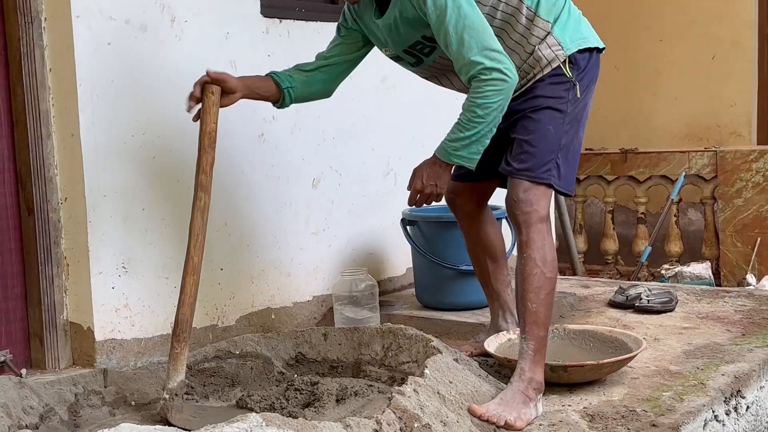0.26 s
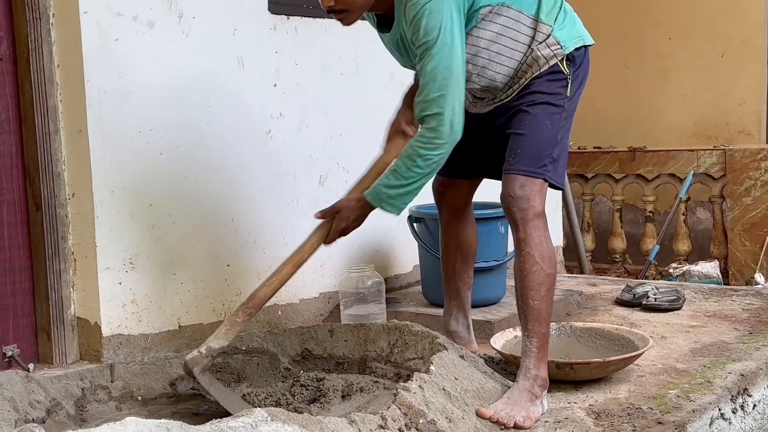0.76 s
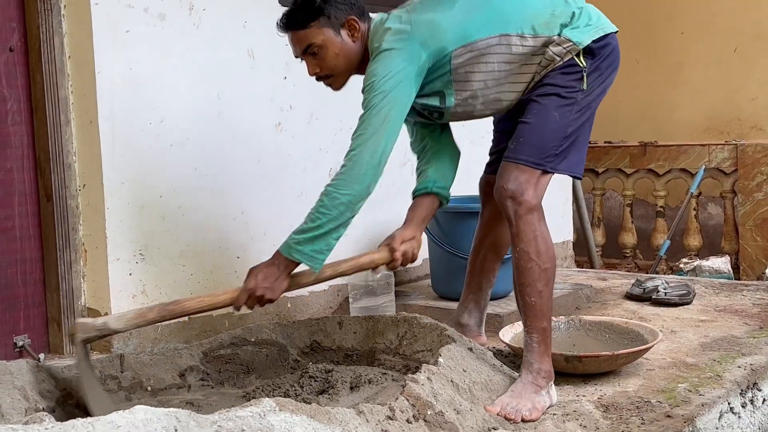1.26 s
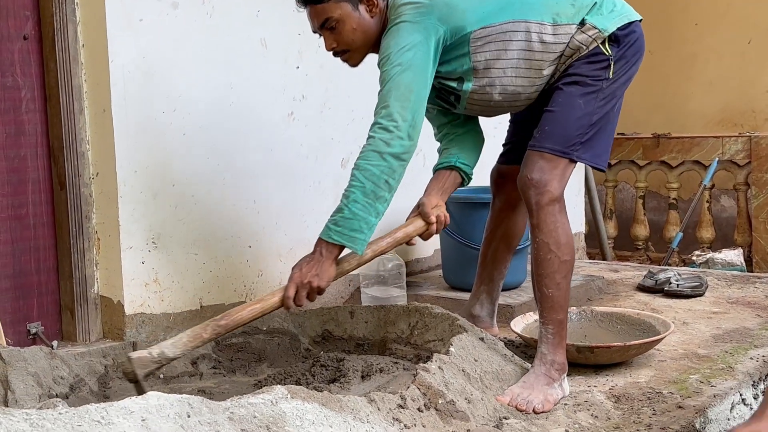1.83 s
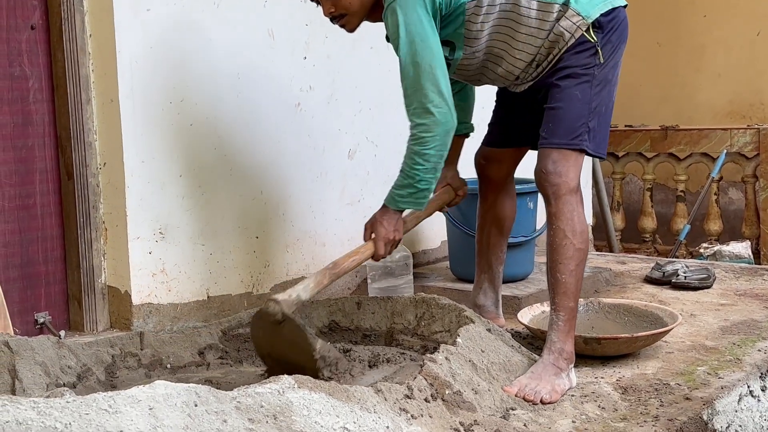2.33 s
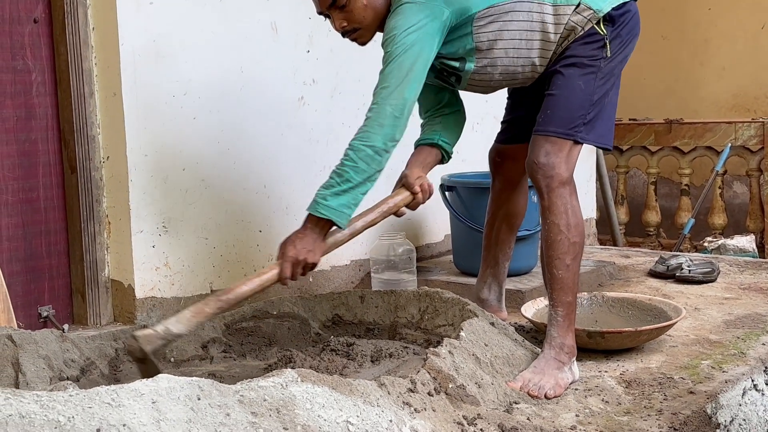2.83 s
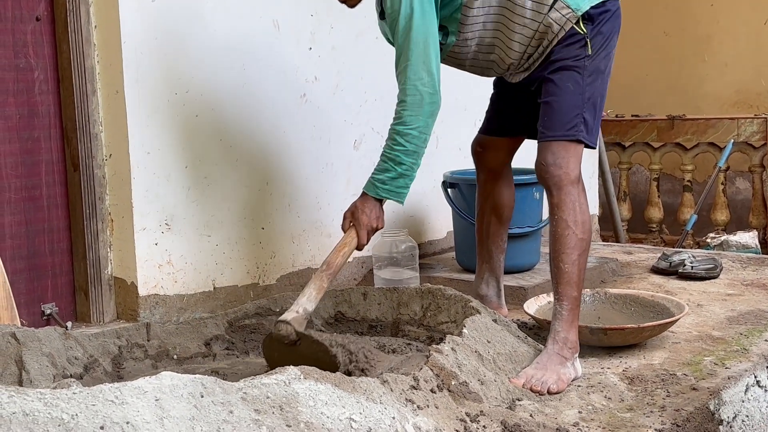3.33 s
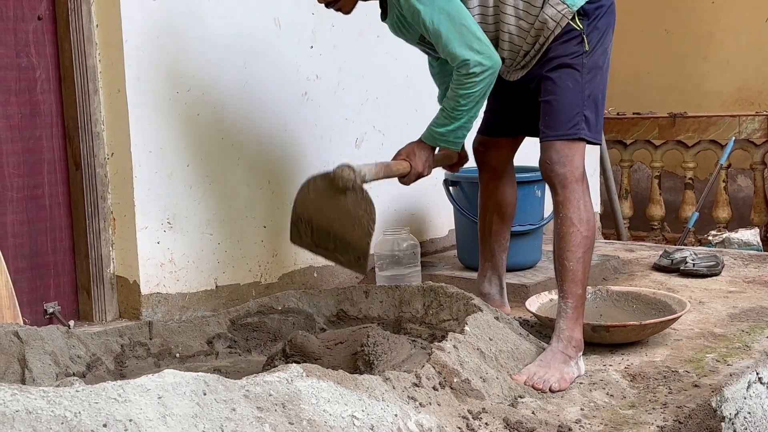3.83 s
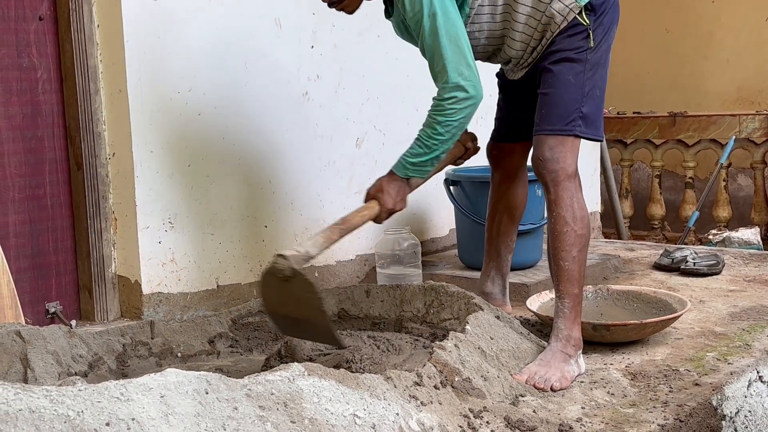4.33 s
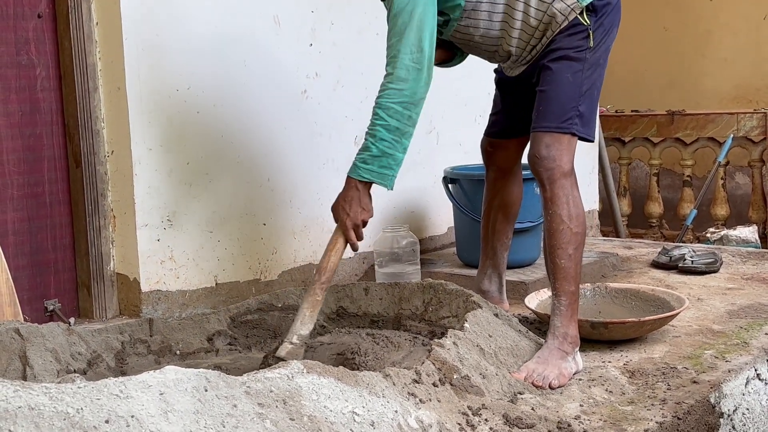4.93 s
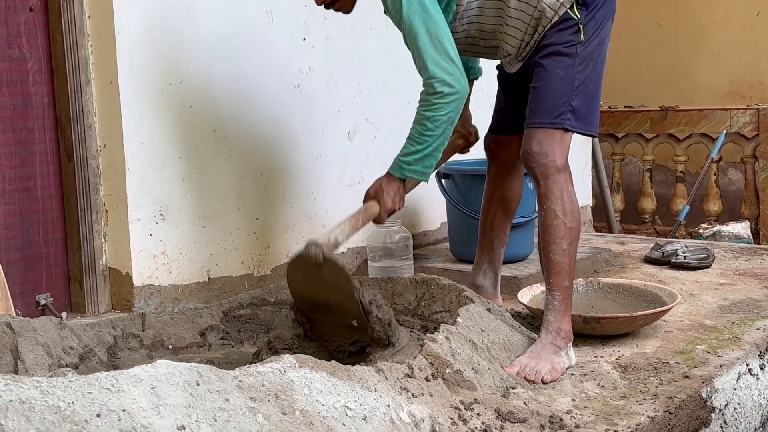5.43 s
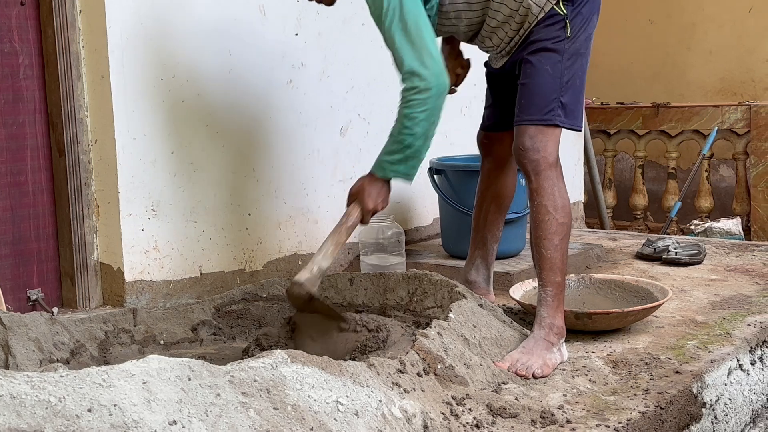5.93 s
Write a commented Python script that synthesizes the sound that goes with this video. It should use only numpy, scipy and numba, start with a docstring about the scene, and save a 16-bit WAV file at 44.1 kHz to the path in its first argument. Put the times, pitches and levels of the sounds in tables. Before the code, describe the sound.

Wet cement mix is scraped, chopped and turned with a hoe beside a wall, with sandy showers, small plops and a low receding engine.

```python
"""Wet mortar is mixed with a steel hoe on a concrete floor beside a house wall.
From the start a distant engine (harmonics and noise in resonances) drops its revs, pulls and recedes;
the air and hum are steady, and the blade drags through the mix (random grains, filtered).
Soon it chops in (stick-slip pulses); mortar lands, slumps or is scraped along in grainy showers; then
clods plop, grains snap, air gulps; late on a far motor drones. Walls echo the work; two microphones hear it."""
import sys
import numpy as np
from scipy import signal
from scipy.fft import rfft, irfft
from scipy.io import wavfile
from scipy.ndimage import uniform_filter1d
from numba import njit

SR = 44100
rng = np.random.default_rng(int(sys.argv[2]) if len(sys.argv) > 2 else 0)


def unload_wav(signal):
    """Save mono or channel-first audio to the path in sys.argv[1] as 16-bit WAV at rate SR, clipped to [-1, 1]."""
    wavfile.write(
        sys.argv[1],
        SR,
        np.round(np.clip(np.atleast_2d(signal).T, -1, 1) * 32767).astype(np.int16),
    )


N = 272538
TIME = np.arange(N) / SR


def undb(db):
    """Amplitude ratio: 20 dB is a factor of ten."""
    return 10 ** (np.asarray(db) / 20)


def unit(x):
    """Power normalization: scale to rms 1."""
    return x / np.sqrt(np.mean(x ** 2) + 1e-18)


def burst(x):
    """Energy normalization: give a short sound the energy of 10 ms at rms 1."""
    return x / np.sqrt(np.sum(x ** 2) / (SR / 100) + 1e-18)


def add(out, s, x):
    """Superposition: sum x into out from time s [s]."""
    i = max(int(s * SR), 0)
    out[i:i + len(x)] += x[:N - i]


def curves(table):
    """Linear interpolation in time of every column after the first."""
    s, *columns = np.transpose(table)
    return [np.interp(TIME, s, c) for c in columns]


def colour(x, points, size=2048):
    """Minimum-phase filtering, by a folded cepstrum, through points (frequency [Hz], gain [dB])."""
    hz, db = np.transpose(points)
    f = np.maximum(np.fft.rfftfreq(size, 1 / SR), 1)
    log_gain = np.log(undb(np.interp(np.log(f), np.log(hz), db)))
    cepstrum = irfft(log_gain)
    cepstrum[1:size // 2] *= 2
    cepstrum[size // 2 + 1:] = 0
    response = irfft(np.exp(rfft(cepstrum)))
    return signal.fftconvolve(x, response)[:len(x)]


@njit
def svf(x, hz, width):
    """Second-order resonance: a state-variable band-pass whose centre may move."""
    y, b, l = np.empty(len(x)), 0., 0.
    for i in range(len(x)):
        g, k = np.tan(np.pi * hz[i] / SR), width / hz[i]
        v = (b + g * (x[i] - l)) / (1 + g * (g + k))
        b, l, y[i] = 2 * v - b, l + 2 * g * v, k * v
    return y


def band(x, hz, width_hz):
    """Cascaded resonance: two equal band-passes in series, fixed or moving."""
    centre = hz + np.zeros(len(x))
    once = svf(x + 1e-18, centre, float(width_hz))
    return svf(once, centre, float(width_hz))


def grains(n, rate, spread_db):
    """Shot noise: random clicks, rate per second on average, many small and a few large."""
    size = undb(spread_db * np.minimum(rng.exponential(size=n), 4))
    struck = rng.random(n) < rate / SR
    return unit(struck * rng.choice([-1, 1], n) * size)


def walk(rate):
    """Low-frequency noise: smoothed random steps, rate per second, at rms near 1."""
    k = max(int(SR / rate), 1)
    steps = np.repeat(rng.standard_normal(N // k + 2), k)
    return unit(uniform_filter1d(steps, k)[:N])


# Distant engine: (time [s], firing rate [1/s], boom level [dB], boom centre [Hz], low thrum level [dB])
ENGINE_COURSE = [(0, 35.5, -39.5, 169, -62), (.17, 23.3, -39, 141, -43.5), (.45, 19.8, -42, 162, -34.5),
                 (.62, 19.9, -44.5, 167, -49.5), (1.1, 18.3, -40, 159.3, -49), (2.1, 19.4, -42.5, 155, -51),
                 (2.7, 19.85, -45.5, 146, -60), (3.5, 19.9, -52.5, 154, -63), (5.1, 22.1, -53, 161, -49),
                 (6.18, 22, -52, 165, -59)]


def engine(boom_width_hz=54, thrum_hz=70, thrum_width_hz=48, flutter_db=3.0,
           rough_db=-12, rough_db_per_hz=1.45, count=12):
    """Harmonic excitation of resonances: low exhaust harmonics, scrambled by many paths between houses."""
    firing_hz, boom_db, boom_hz, thrum_db = curves(ENGINE_COURSE)
    turns = np.cumsum(firing_hz * (1 + 0.0028 * walk(6))) / SR
    k = np.arange(2, count)[:, None]
    # each harmonic has its own starting phase and flutter
    tones = np.sqrt(2) * np.sin(2 * np.pi * (k * turns + rng.random(k.shape)))
    harmonics = tones * np.array([undb(flutter_db * walk(4)) for _ in k])
    # the boom is rougher at high revs
    noise_db = boom_db + rough_db + rough_db_per_hz * (firing_hz - firing_hz.min())
    out = undb(noise_db) * unit(band(rng.standard_normal(N), boom_hz, boom_width_hz))
    for db, hz, width in (boom_db, boom_hz, boom_width_hz), (thrum_db, thrum_hz, thrum_width_hz):
        detuning = ((k * firing_hz - hz) / (width / 2)) ** 2
        gain = 1 / (1 + detuning ** 2)
        out = out + undb(db) * np.sum(gain * harmonics, axis=0) / np.sqrt(np.sum(gain ** 2, axis=0))
    return out


# Spectrum of the outdoor air: (frequency [Hz], gain [dB])
AIR_SPECTRUM = [(22, -42), (36, -2), (50, -5.5), (65, 3.5), (110, -1.5), (170, -6.5), (240, -9.5),
                (480, -15), (1000, -19), (2500, -28), (7000, -37.5), (15500, -58)]
# Steady machine hum: (frequency [Hz], level [dB])
HUM_TONES = [(38.3, -54.5), (60, -62.5)]
AIR_DB = -50


def yard(side_db=-19):
    """Partial coherence: shared noise and hum with a little opposed noise in the two microphones."""
    mid, side = (unit(colour(rng.standard_normal(N), AIR_SPECTRUM, size=8192)) for _ in range(2))
    side = colour(side, [(35, -7), (130, 4.5), (800, 18.5), (2500, -4)])
    hum = sum(undb(db) * unit(np.sin(2 * np.pi * hz * TIME + 0.5 * walk(2.8))) for hz, db in HUM_TONES)
    pair = mid + undb(side_db) * side * np.array([[1], [-1]])
    return hum + undb(AIR_DB + 1.05 * walk(4.96)) * pair


# every stroke eases off as the arm slows, then the blade lifts
STROKE_SAG_DB_PER_S, STROKE_LIFT_DB_PER_S = 6, 187


def stroke(s, swell, length):
    """Force envelope: smooth build-up of arm speed, slow easing, then a steep decay as the blade lifts."""
    t = np.maximum(TIME - s, 0)
    sag_db = STROKE_SAG_DB_PER_S * np.maximum(t - swell, 0)
    lift_db = STROKE_LIFT_DB_PER_S * np.maximum(t - length, 0)
    rise = np.sin(np.pi / 2 * np.minimum(t / swell, 1)) ** 2
    return rise * undb(-np.minimum(sag_db + lift_db, 200))


# Damped modes of blade and handle in the mud: (frequency [Hz], width [Hz], gain [dB])
BLADE_MODES = [(747, 170, 6), (1013, 260, 6.5), (1245, 600, 12), (1675, 125, 9), (1994, 520, 5),
               (2360, 1200, 0.5), (3180, 1800, -6.5)]


def blade(x):
    """Modal superposition: the hoe's short, muddy ring as a sum of damped resonances."""
    return sum(undb(db) * band(x, hz, width) for hz, width, db in BLADE_MODES)


# Strokes of the blade pulled through the mix:
# (time [s], swell [s], start to lift [s], relative level [dB], wetness [dB])
PULL_STROKES = [(0, 0.0022, 0.12, -50, 6.5), (0.134, 0.024, 0.45, -57, 9.5),
                (0.601, 0.008, 0.21, -44, -0.5), (0.84, 0.0067, 0.13, -41.5, -1),
                (1.004, 0.029, 0.76, -52, 3.5), (1.415, 0.12, 0.2, -48.5, 6),
                (1.643, 0.0047, 0.1, -41, 3.5), (1.751, 0.018, 0.25, -44.5, 7),
                (2.014, 0.042, 0.08, -40.5, 6.5), (2.12, 0.028, 0.21, -49.5, 2),
                (2.853, 0.025, 0.53, -46, 0.5), (3.45, 0.052, 0.15, -54.5, 2.5),
                (4.036, 0.018, 0.23, -47.5, 0.5), (4.31, 0.023, 0.3, -50.5, 1),
                (4.616, 0.023, 0.02, -40.5, -1), (4.641, 0.12, 0.32, -43, -0.5),
                (4.762, 0.019, 0.033, -39.5, -7), (4.94, 0.058, 0.099, -43.5, 2),
                (5.061, 0.023, 0.39, -51.5, 3), (5.664, 0.028, 0.17, -56, 6.5),
                (5.916, 0.039, 0.53, -52.5, 1)]
# The flat of the blade skims wet sand and only hisses:
# (time [s], swell [s], start to lift [s], relative level [dB])
SKIM_STROKES = [(0.409, 0.064, 0.1, -43), (2.359, 0.045, 0.18, -53), (2.765, .13, 0.14, -44),
                (3.1, 0.072, 0.12, -44.5), (3.492, 0.15, 0.12, -44), (3.956, 0.012, 0.094, -42),
                (5.135, 0.06, 0.077, -46.5), (5.321, 0.1, 0.17, -47.5)]
# Spectrum of rolling sand: (frequency [Hz], gain [dB])
SAND_SPECTRUM = [(300, -2.5), (1200, -3.5), (2600, 2), (3800, 0), (5000, -0.5), (7000, 2), (8500, 2),
                 (10200, 0.5), (11800, -6.5), (15500, -7)]
# Spectrum of coarse grit on the edge: (frequency [Hz], gain [dB])
RASP_SPECTRUM = [(200, -14), (500, -8), (800, 6), (1300, 4), (2000, 0.5), (3000, -9), (6000, -32),
                 (15000, -39)]
# Spectrum of wet lumps: (frequency [Hz], gain [dB])
MUD_SPECTRUM = [(40, -30.5), (120, -3), (260, 6.5), (480, 4), (750, -4), (1400, -11), (5000, -69)]
# hiss and rasp lost [dB] per dB of wetness: a wetter mix churns more
WET_MUFFLE, WET_SMOOTH = 0.3, 0.1
# loose sand keeps trickling between strokes; level before the layer gains
TRICKLE_DB = -63.5


def drag(catch_db=1.88, sand_gain_db=1.15, rasp_gain_db=-3.5, mud_gain_db=-3.0, crackle_db=-12,
         crackle_rate=160, crackle_s=0.0007, ring_gain_db=-9, fold_db=1.5):
    """Granular friction: sand rolls under steel, grit catches and rings the blade, wet lumps fold over."""
    # strokes that overlap add in power
    sand_power = rasp_power = mud_power = undb(TRICKLE_DB) ** 2
    for s, swell, length, db, wet_db in PULL_STROKES:
        force = undb(db) * stroke(s, swell, length)
        sand_power = sand_power + (force * undb(-WET_MUFFLE * wet_db)) ** 2
        rasp_power = rasp_power + (force * undb(-WET_SMOOTH * wet_db)) ** 2
        mud_power = mud_power + (force * undb(wet_db)) ** 2
    for s, swell, length, db in SKIM_STROKES:
        sand_power = sand_power + (undb(db) * stroke(s, swell, length)) ** 2

    catching = undb(catch_db * np.clip(walk(55), -2, 2))
    sand = undb(sand_gain_db) * unit(colour(grains(N, 16000, 2.3), SAND_SPECTRUM))
    rasp = undb(rasp_gain_db) * unit(colour(grains(N, 3000, 1.6), RASP_SPECTRUM))
    folding = undb(mud_gain_db + fold_db * np.clip(walk(70), -2, 2))
    mud = folding * unit(colour(grains(N, 700, 1.9), MUD_SPECTRUM))
    # now and then a larger grain breaks with a short snap
    snap_decay = np.exp(-TIME[:SR // 100] / crackle_s)
    snaps = signal.fftconvolve(np.abs(grains(N, crackle_rate, 2.4)), snap_decay)[:N]
    crackle = undb(crackle_db) * unit(colour(snaps * rng.standard_normal(N), SAND_SPECTRUM))
    ring = undb(ring_gain_db) * unit(blade(grains(N, 900, 2.4)))

    hiss = (sand + crackle) * np.sqrt(sand_power)
    scrape = (rasp + ring) * np.sqrt(rasp_power)
    churn = mud * np.sqrt(mud_power)
    return catching * (hiss + scrape + churn)


# The blade bites and judders on the floor; judder, grit and thud levels are energies relative to 10 ms at rms 1:
# (time [s], judder level [dB], contact [s], judder rate [Hz], crushed grit level [dB],
#  thud level [dB], thud centre [Hz], trapped-air pock level [dB], pock frequency [Hz])
CHOP_IMPACTS = [(.4700, -25.5, 0.0057, 3110, -26.5, -36.5, 395, -25.5, 3190),
                (1.7294, -22.5, 0.0052, 2248, -24, -26, 190, -15.5, 2240),
                (1.737, -28, 0.0049, 667, -32.5, -22.5, 396, -16, 660),
                (2.88, -21, 0.0086, 1700, -25, -25.5, 570, -15, 1920),
                (4.0576, -19, 0.00904, 1099, -24, -31, 470, -17, 1056),
                (5.1966, -23, 0.00907, 1526, -30, -24, 400, -13.5, 517),
                (5.2088, -21.5, 0.0019, 1710, -25, -21, 393, -16, 1860)]


def chops(jitter=0.23, grit_fall_s=0.0064, crumble_db=-14, crumble_s=0.038, thud_s=0.0067,
          thud_width=1.0, crunch_db=-2, crunch_width=0.64, pock_swell_s=0.0013, pock_t60_s=0.031, count=40):
    """Stick-slip impact: the edge judders for a few ms, crushes sand and thumps the heap."""
    out, t = np.zeros(N), TIME[:SR // 4]
    for s, db, contact, judder_hz, grit_db, thud_db, thud_hz, pock_db, pock_hz in CHOP_IMPACTS:
        chance = rng.standard_normal((count, 2))
        when = (np.arange(count) + 1 + np.clip(jitter * chance[:, 0], -1, 1)) / judder_hz
        slip_sample = np.minimum(when * SR, len(t) - 1).astype(int)
        slips = np.zeros(len(t))
        slips[slip_sample] = np.exp(0.1 * chance[:, 1] - 3 * (2 * when / contact - 1) ** 2)

        # the force builds through the first half of the contact; then the cut face crumbles
        press = np.minimum(2 * t / contact, 1) ** 2
        after = np.maximum(t - contact / 2, 0)
        bite = press * np.exp(-after / grit_fall_s)
        crumble = press * undb(crumble_db) * np.exp(-after / crumble_s)
        crushed = bite * grains(len(t), 20000, 4.1) + crumble * grains(len(t), 4000, 1.7)
        grit = colour(crushed, SAND_SPECTRUM)

        scratches = (bite + crumble) * grains(len(t), 3600, 0.56)
        ring = blade(burst(slips) + 0.31 * burst(scratches))
        # coarse grains crack under the edge, at a pitch near that of the judder
        crunch = band(bite * grains(len(t), 7000, 8.1), judder_hz, crunch_width * judder_hz)
        steel = burst(ring) + undb(crunch_db) * burst(crunch)

        blow = press * np.exp(-after / thud_s) * rng.standard_normal(len(t))
        thud = band(blow, thud_hz, thud_width * thud_hz)
        # air trapped under the blade gives a hollow pock
        pock_shape = np.minimum(after / pock_swell_s, 1) * undb(-60 * after / pock_t60_s)
        pock = pock_shape * np.sin(2 * np.pi * pock_hz * after)
        impact = undb(db) * burst(steel) + undb(grit_db) * burst(grit) + undb(thud_db) * burst(thud)
        add(out, s, undb(pock_db) * pock + impact)
    return out


# Mortar lands, slumps or is scraped along; levels precede the flow envelope:
# (time [s], length [s], sand level [dB], patter level [dB], first patter centre [Hz],
#  last patter centre [Hz], weight level [dB], lumpiness [dB])
GRAINY_SHOWERS = [(0.609, 0.0097, -41.5, -43, 1200, 900, -36, 4),
                  (0.866, 0.077, -37, -34.5, 1310, 1150, -53, -1),
                  (1.827, 0.012, -39, -39.5, 2300, 1820, -40, 5),
                  (2.161, 0.021, -30, -33.5, 1890, 1385, -39.5, -1.5),
                  (3.221, 0.012, -29, -33, 1936, 1700, -35.5, 1),
                  (3.24, 0.071, -35, -34, 1350, 1030, -50, 0),
                  (4.383, 0.012, -29.5, -37, 1700, 1160, -36, 5.5),
                  (4.398, 0.072, -29.5, -30, 2000, 1290, -37.5, 1.5),
                  (5.244, 0.023, -42.5, -41.5, 1310, 920, -38.5, 2),
                  (5.574, 0.012, -29, -33, 2100, 1650, -41, 0),
                  (5.598, 0.065, -35, -34.5, 1290, 1200, -43.5, 2),
                  (5.881, 0.019, -38, -47.5, 1720, 1328, -52, -2.5)]
# rise as a share of the length; time to fall 20 dB afterwards [s]
SHOWER_RISE_SHARE, SHOWER_FADE_S = 0.3, 0.07


def showers(patter_width_hz=680, wander=0.098):
    """Granular flow: mortar lands, slumps or is scraped along in lumps and grains, its patter sinking in pitch."""
    out, t = np.zeros(N), TIME[:SR // 2]
    lumps, size = np.clip(walk(220), -1.5, 1.5), walk(220)
    for s, length, sand_db, patter_db, first_hz, last_hz, weight_db, lumps_db in GRAINY_SHOWERS:
        rise = np.minimum(t / (SHOWER_RISE_SHARE * length), 1)
        flow = rise * undb(-20 * np.maximum(t - length, 0) / SHOWER_FADE_S)
        now = (int(s * SR) + np.arange(len(t))) % N
        # the centre wanders with lump size: larger is lower
        centre = np.interp(t, [0, length], [first_hz, last_hz]) * np.exp(-wander * size[now])
        clump = undb(lumps_db * lumps[now])
        sand = unit(colour(np.sqrt(clump) * grains(len(t), 14000, 3.2), SAND_SPECTRUM))
        patter = unit(band(clump * grains(len(t), 2200, 0.28), centre, patter_width_hz))
        weight = unit(colour(clump * grains(len(t), 1200, 0.8), MUD_SPECTRUM))
        shower = undb(sand_db) * sand + undb(patter_db) * patter + undb(weight_db) * weight
        add(out, s, flow * shower)
    return out


# Small wet clods drop: (time [s], plop level [dB], nominal frequency [Hz])
CLOD_DROPS = [(1.083, -33, 1320), (1.1198, -25, 860), (1.147, -35, 1366), (1.163, -35, 640),
              (1.212, -36, 1400), (2.314, -32.5, 1660), (3.024, -29.5, 1325), (3.069, -36, 987),
              (3.444, -43, 1900), (3.463, -39, 1600), (4.267, -36, 1890), (5.785, -38.5, 1502)]


def clods(swell_s=0.00097, sag=0.22, grit_db=-13, splat_db=-3, splat_s=0.0019):
    """Damped oscillation: a brief plop sags in pitch as the clod flattens, with crumbs and a snap of sand."""
    out, t = np.zeros(N), TIME[:SR // 30]
    shape = t / swell_s * np.exp(1 - t / swell_s)
    scatter = t / splat_s * np.exp(1 - t / splat_s)
    for s, db, hz in CLOD_DROPS:
        falling_hz = hz * (1 - sag + 2 * sag * np.exp(-t / (2 * swell_s)))
        tone = np.sin(2 * np.pi * np.cumsum(falling_hz) / SR)
        snap = unit(colour(rng.standard_normal(len(t)), SAND_SPECTRUM))
        splat = unit(band(rng.standard_normal(len(t)), hz, 2 * hz))
        plop = shape * (tone + undb(grit_db) * snap)
        add(out, s, undb(db) * (plop + undb(splat_db) * scatter * splat / 2))
    return out


# Single grains crack against the steel: (time [s], energy level relative to 10 ms at rms 1 [dB])
GRAIN_TICKS = [(1.0837, -46), (1.1047, -43), (1.1491, -47), (1.2209, -46), (1.2953, -47)]


def ticks(fall_s=0.0017):
    """Impulsive fracture: a grain splits in a bright, exponentially decaying noise burst."""
    out, t = np.zeros(N), TIME[:SR // 50]
    for s, db in GRAIN_TICKS:
        noise = np.exp(-t / fall_s) * rng.standard_normal(len(t))
        snap = colour(noise, [(800, 2), (3000, -2), (7000, 5), (15000, -1.0)])
        add(out, s, undb(db) * burst(snap))
    return out


# Air pockets close in the wet mix:
# (time [s], tone level [dB], starting frequency [Hz], swell [s], 60 dB decay time [s])
AIR_GULPS = [(1.863, -26, 396, 0.0013, 0.023), (1.943, -20.5, 315, 0.0043, 0.051),
             (2.071, -22, 270, 0.01, 0.065), (5.896, -30, 294, 0.0041, 0.03)]


def gulps(glide=0.65, squelch_db=-10):
    """Cavity resonance: an air pocket rings and rises slightly as the mud squelches shut."""
    out, t = np.zeros(N), TIME[:SR // 5]
    for s, db, hz, swell, t60 in AIR_GULPS:
        shape = np.minimum(t / swell, 1) * np.exp(-np.log(1000) * np.maximum(t - swell, 0) / t60)
        tone = np.sin(2 * np.pi * hz * t * (1 + glide * t))
        squelch = unit(colour(grains(len(t), 2500, 0.93), MUD_SPECTRUM))
        add(out, s, undb(db) * shape * (tone + undb(squelch_db) * squelch))
    return out


# A second far motor: (time [s], relative level [dB], mean frequency [Hz])
DRONE_COURSE = [(3.9, -73, 92.6), (4.5, -57, 93), (5.7, -48, 90), (6.18, -69, 87.8)]


def drone():
    """Frequency modulation: one low tone wavers slightly about its mean pitch."""
    db, hz = curves(DRONE_COURSE)
    turns = np.cumsum(hz * (1 + 0.0113 * walk(8.6))) / SR
    return undb(db) * unit(np.sin(2 * np.pi * turns))


def walls(x, wet_db=-10, t60_s=0.17, first_s=0.0042, side_db=-8.0):
    """Diffuse reverberation: decaying noise echoes, nearly alike in both channels, with a filtered opposed part."""
    t = TIME[:SR // 2]
    tail = np.clip(t / first_s - 1, 0, 1) * np.exp(-np.log(1000) * t / t60_s)
    energy = np.sum(tail ** 2)
    mid, side = (tail * rng.standard_normal(len(t)) / np.sqrt(energy) for _ in range(2))
    side = colour(side, [(150, -14.0), (700, 9.5), (1300, 6.0), (2200, -30), (6000, -43), (13000, 1)])
    mid, side = (undb(wet_db) * signal.fftconvolve(x, ir)[:N] for ir in (mid, side))
    return x + mid + undb(side_db) * side * np.array([[1], [-1]])


def scene():
    """Superposition: the work with its wall echoes, over the engines and the open air."""
    work = drag() + chops() + showers() + clods() + ticks() + gulps()
    return engine() + yard() + walls(work) + drone()


# Phase by which the left microphone leads the right: (frequency [Hz], phase [rad])
MICROPHONE_PHASE = [(0, 0), (1300, -.15), (2100, .05), (3700, .6), (5400, 0), (6500, .05), (7300, 1.1),
                    (7900, 3.05), (8600, 3.1), (9200, 1.5), (11200, .05), (13000, 0), (15800, -2.0)]
TOP_HZ = 15800


def record(dry, left_db=1.5):
    """Interchannel difference: phase and a low-range level offset part the pair; a low-pass cuts the top."""
    hz = np.fft.rfftfreq(N, 1 / SR)
    lead = np.interp(hz, *np.transpose(MICROPHONE_PHASE))
    balance_db = np.interp(hz, [60, 120, 1200, 1800], [0, left_db, left_db, 0])
    # each difference is split evenly between left and right
    half = np.array([[1], [-1]]) / 2
    pair = irfft(rfft(dry) * np.exp(1j * half * lead) * undb(half * balance_db), N)
    low_pass = signal.ellip(10, .2, 70, TOP_HZ, fs=SR, output="sos")
    return signal.sosfilt(low_pass, pair)


dry = scene()
out = record(dry)
unload_wav(out)
```